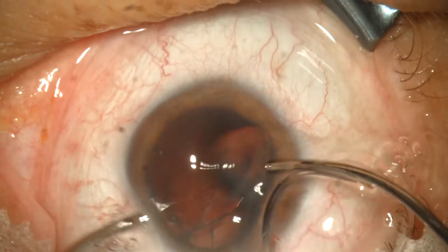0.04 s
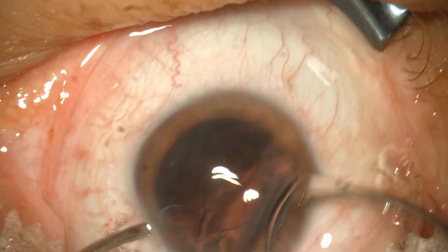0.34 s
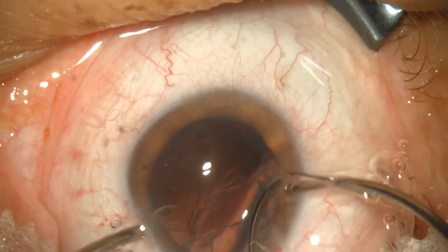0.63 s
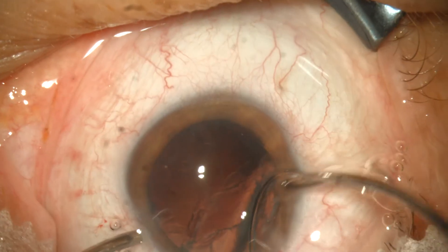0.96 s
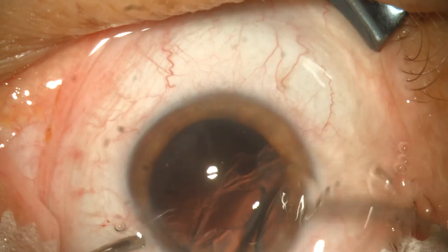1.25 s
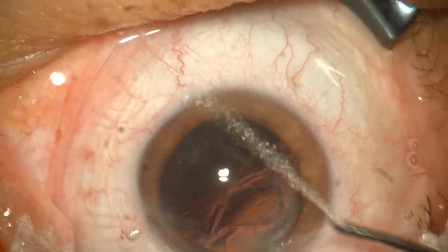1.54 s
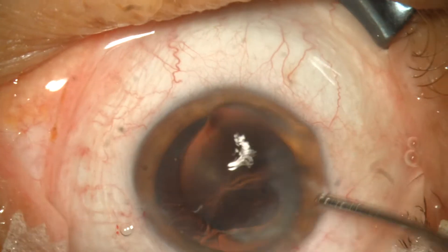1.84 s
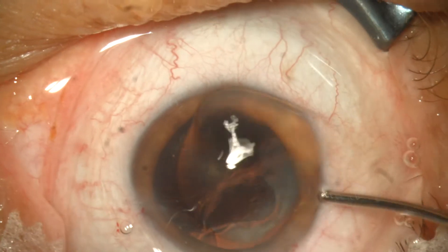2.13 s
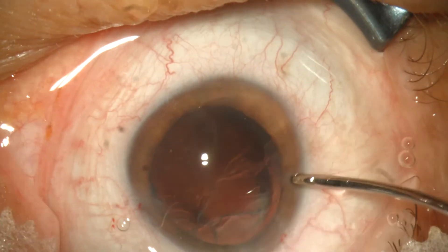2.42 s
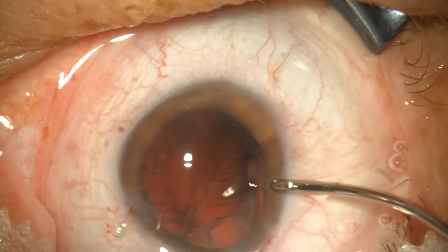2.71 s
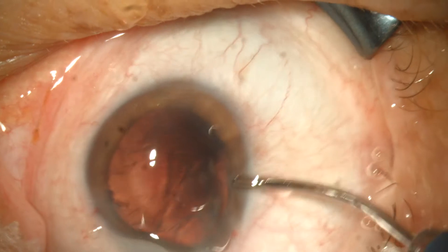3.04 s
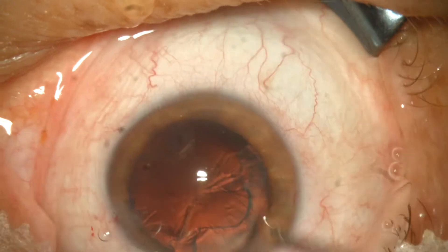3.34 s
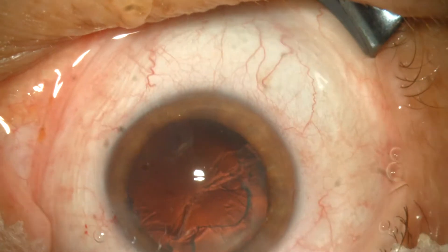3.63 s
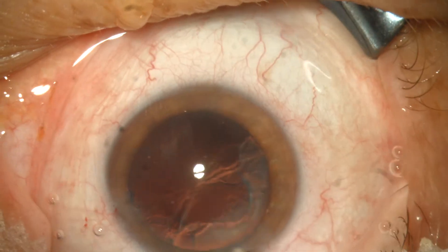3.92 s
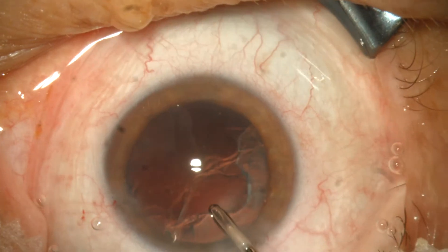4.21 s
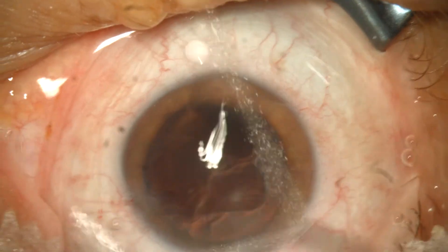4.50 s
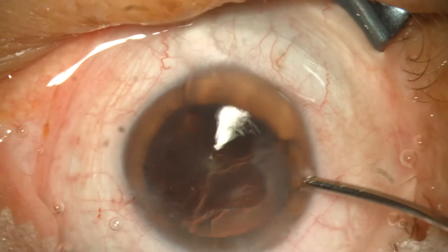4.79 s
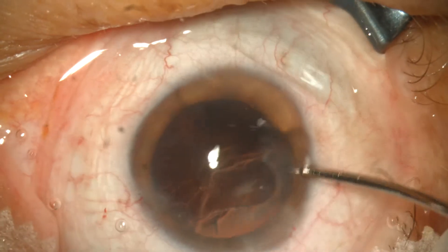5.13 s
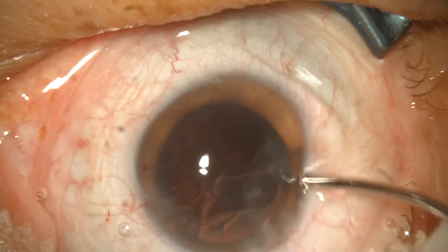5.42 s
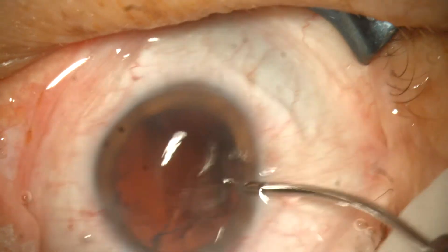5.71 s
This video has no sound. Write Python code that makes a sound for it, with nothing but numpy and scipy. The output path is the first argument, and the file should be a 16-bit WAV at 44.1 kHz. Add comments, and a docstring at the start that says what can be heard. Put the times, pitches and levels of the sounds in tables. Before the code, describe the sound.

Steady, quiet ventilation with a slight fan hum and thin hiss fills an operating room throughout. Dull, low handling bumps come around 0.6 to 0.8 seconds. At 1.3 seconds a steel instrument snaps shut with a sharp, tight click, answered briefly by the hard walls. A soft bump follows at 1.6 seconds, then light ticks of metal tips at 2.6 and around 3.4 seconds. The second snap comes at 3.6 seconds, just as sharp. At 4.2 seconds a small instrument is laid on a pile of others with a bright clink, and from 4.4 to 4.6 seconds a larger one lands, bouncing and ringing as the pile clatters. Another dull bump comes near 4.9 seconds. Very faint swishes of cloth come and go between the events, the last near 5.8 seconds. Everything sits in the centre, picked up by one microphone.

```python
"""An operating room: a steel instrument snaps shut twice, its catch ringing over a noisy crack.
Then two instruments are laid on a pile of others, bouncing and clinking as the pile clatters.
Small ticks of the tips, soft swishes of cloth and dull handling bumps lie between, over steady
ventilation. Hard walls answer each click; one microphone feeds both channels, each with a faint
hiss of its own."""
import sys
import numpy as np
from scipy import signal
from scipy.fft import rfft, irfft, next_fast_len
from scipy.io import wavfile

SR = 44100
rng = np.random.default_rng(int(sys.argv[2]) if len(sys.argv) > 2 else 0)


def file_out(sig):
    """Save sig as 16-bit WAV at sys.argv[1]."""
    # one column per channel
    cols = np.atleast_2d(sig).T
    # limit, then scale
    lim = np.clip(cols, -1, 1)
    pcm = np.round(lim * 32767).astype(np.int16)
    wavfile.write(sys.argv[1], SR, pcm)


N = 258070
TIME = np.arange(N) / SR  # scene clock [s]
AGE = np.arange(SR) / SR  # clock of a one-shot [s]

# reverb of the hard walls: (frequency [Hz], t60 [s])
WALL_DECAY = [(300, 0.94), (1200, 0.77), (2300, 0.63), (4000, 0.41), (7000, 0.42), (14000, 0.39)]
# tone of the air flow: (frequency [Hz], relative density [dB])
AIR_SPECTRUM = [(120, -2), (200, -7.5), (333, -5.5), (400, -2), (564, -0.5), (755, -9), (1280, -7),
                (1710, -14.5), (2450, -13), (2780, -13), (3030, -18), (3270, -14), (3800, -19.5),
                (5800, -20), (15500, -30.5)]
# hum of fans and motors: (frequency [Hz], level [dB])
FAN_TONES = [(23.9, -59.5), (47.8, -70), (96, -73), (388, -73), (710.6, -74), (1583, -78), (2099, -77.5),
             (2735, -74.5)]
# low end of the handling: (frequency [Hz], relative density [dB])
RUMBLE_SPECTRUM = [(25, -3.5), (45, 4.5), (80, 1.5), (150, -4), (250, -11), (400, -21), (800, -71)]
# movements of hands and arms: (peak time [s], relative level [dB], length [s])
HAND_MOVES = [(0.662, -46.5, .11), (.78, -47.5, 0.062), (1.62, -53, .14), (3.03, -51.5, 0.052),
              (3.587, -49.5, .08), (4.087, -55, 0.049), (4.76, -49, .18), (5.519, -61, .06)]
# dull bumps that stand out: (time [s], level [dB], pitch [Hz])
DULL_BUMPS = [(0.627, -39.5, 150), (.685, -43, 210), (.778, -40, 86.4), (1.611, -39, 141),
              (2.44, -46.5, 118), (3.412, -44.5, 88), (4.085, -42.5, 105), (4.73, -45, 180),
              (4.864, -36.5, 202)]
# tone of sliding cloth: (frequency [Hz], relative density [dB])
CLOTH_SPECTRUM = [(500, -23), (1500, 3.5), (3500, -1.5), (5800, 0), (7500, -16), (12000, -22.5)]
# strokes over cloth: (peak time [s], level [dB], length [s])
CLOTH_STROKES = [(0.477, -59, 0.062), (1.025, -61.5, 0.076), (1.54, -59.5, .05), (2.075, -66, 0.22),
                 (2.276, -60, 0.094), (2.644, -61.5, .15), (3.45, -56.5, 0.13), (4.914, -64.5, 0.092),
                 (5.772, -61.5, 0.16)]
# light touches of the tips: (time [s], level [dB], pitch [Hz], half-width [octaves])
TIP_TOUCHES = [(2.623, -40.5, 5000, .24), (3.3425, -49, 5700, .2), (3.3482, -40.5, 1980, 0.1),
               (3.3585, -48.5, 6500, 0.15), (3.392, -42, 5270, 0.22), (3.3987, -42, 5500, 0.18),
               (4.3946, -27, 3800, 0.072)]
# dense modes of the pile: (frequency [Hz], relative density [dB])
PILE_SPECTRUM = [(290, -58), (500, -26), (901, -22), (1410, -12), (1800, -15.5), (1960, -12), (2430, -18),
                 (2650, -10), (3680, -12.5), (4190, -3.5), (5350, -9), (6270, -2), (6830, -17),
                 (7890, -16.5), (15500, -40)]
# modes of the small and the large instrument: (frequency [Hz], relative level [dB], free t60 [s])
SMALL_STEEL_MODES = [(2981, -13, .25), (3900, -6, .2), (4113, -5, .2), (4317, -9, .3), (4554, -4, .12),
                     (5076, -12, .4), (5443, -11, .2), (5705, -3, .3), (5890, -3, .15), (6202, -6, .2),
                     (6330, -9, .15), (7863, -19, .2), (9200, -23, .25), (9980, -24, .25)]
LARGE_STEEL_MODES = [(1249, -21, .5), (1410, -19, .3), (1900, -20, .3), (1997, -23, .5), (2304, -25, .4),
                     (2616, -12, .75), (2875, -18, .5), (3400, -16, .3), (3860, -13, .3), (4077, 0, .28),
                     (4322, -1, .22), (4725, -3, .6), (5001, -11, .35), (5056, -6, .28), (5438, -15, .3),
                     (5705, -8, .3), (6013, -13, .38), (6210, -6, .44), (6270, -6, .32), (6556, -16, .35),
                     (7207, -19, .4), (7342, -14, .55), (7863, -18, .28), (8140, -20, .3), (8366, -20, .3),
                     (8790, -21, .3), (9707, -24, .35), (11880, -31, .2)]
# their contacts with the pile: (time [s], ring level [dB], clatter level [dB], clatter t60 [s])
SMALL_CONTACTS = [(4.2483, -24, -27, 0.08), (4.2522, -32, -26, 0.069), (4.2935, -39, -38, 0.14),
                  (4.329, -37, -55, .06)]
LARGE_CONTACTS = [(4.3990, -45.5, -37, 0.12), (4.4545, -23.5, -29.5, 0.069), (4.4565, -18.5, -22.5, 0.12),
                  (4.4683, -32.5, -40, 0.057), (4.5125, -27, -28.5, 0.048), (4.5545, -40, -37, .14)]
# ring of the catch: (frequency [Hz], relative level [dB], t60 [s])
CATCH_MODES = [(1320, -21, .04), (2190, -6, .02), (3400, 0, .012), (4780, 0, .018), (5300, -2, .018),
               (6600, -8, .01)]
# tone of its crack: (frequency [Hz], relative density [dB])
CRACK_SPECTRUM = [(300, -8.5), (900, -7), (1350, -2.5), (1750, -6.5), (2200, -2), (2750, -14), (3450, 2),
                  (4300, -2), (5300, -1.5), (6700, -3.5), (8000, -16), (9300, -27), (11500, -22.5),
                  (15500, -32)]
# two snaps, the second with a rebound: (time [s], ring level [dB], crack level [dB], crack t60 [s])
CATCH_SNAPS = [(1.2781, -15.5, -26, 0.047), (3.649, -14, -26, 0.039), (3.6548, -26, -35, 0.02)]


def amp(db):
    """Decibels to gain."""
    return 10 ** (np.asarray(db) / 20)


def unit(x):
    """Scale to rms 1."""
    return x / np.sqrt(np.mean(x ** 2) + 1e-20)


def along(points, hz):
    """Read a curve of (frequency [Hz], value) points on a log axis."""
    freqs, values = np.transpose(points)
    return np.interp(np.log(hz + 1), np.log(freqs + 1), values)


def filtered(x, response):
    """EQ x with a gain that depends on frequency."""
    n = x.shape[-1]
    padded = next_fast_len(n + SR // 2)
    return irfft(rfft(x, padded) * response(np.fft.rfftfreq(padded, 1 / SR)), padded)[..., :n]


def noise(spectrum, size):
    """Coloured noise of rms 1."""
    return unit(filtered(rng.standard_normal(size), lambda hz: amp(along(spectrum, hz))))


def fade(t60, t=AGE):
    """A decay that loses 60 dB in t60 seconds."""
    return np.exp(-np.log(1000) * t / t60)


def swell(at, rise, fall):
    """A smooth envelope that peaks at the given time."""
    return np.exp(-((TIME - at) / np.where(TIME < at, rise, fall)) ** 2 / 2)


def add(track, at, sound):
    """Mix a one-shot into a track at a time in seconds."""
    part = track[max(round(at * SR), 0):][:len(sound)]
    part += sound[:len(part)]


def ring(modes):
    """Struck steel rings freely as decaying sines, starting at rms 1."""
    hz, db, t60 = np.transpose(modes)[:, :, None]
    phase = rng.uniform(0, 2 * np.pi, db.shape)
    partials = amp(db) * fade(t60) * np.sin(2 * np.pi * hz * AGE + phase)
    return np.sum(partials, 0) / np.sqrt(np.sum(amp(db) ** 2) / 2)


def room(x, wet_db, early_db):
    """The direct sound, early reflections off nearby surfaces and the diffuse tail of the walls."""
    hz, t, bands = signal.stft(rng.standard_normal(SR), SR, nperseg=256)
    bands = bands * fade(along(WALL_DECAY, hz)[:, None], t)
    tail = signal.istft(bands, SR, nperseg=256)[1][:SR]
    tail *= 1 - np.exp(-AGE / 0.0066)  # the reverb builds up
    impulse = amp(wet_db) * tail / np.linalg.norm(tail)
    delays = rng.uniform(0.0034, .013, size=10)
    impulse[(delays * SR).astype(int)] += amp(early_db) * rng.choice([-1, 1], size=10) / np.sqrt(10)
    return x + signal.fftconvolve(x, impulse)[:N]


def ventilation(air_db=-57):
    """The bed: steady air flow under the slightly wavering hum of fans and motors."""
    out = amp(air_db) * noise(AIR_SPECTRUM, N)
    for hz, db in FAN_TONES:
        drift = np.cumsum(rng.standard_normal(N)) / np.sqrt(SR)
        out += amp(db) * np.sqrt(2) * np.sin(2 * np.pi * hz * TIME + drift)
    return out


def jostles(per_second=45, boost_db=1.5, pitch_hz=175, scatter_octaves=.35):
    """Small pushes scattered through each movement: (time [s], level [dB], pitch [Hz])."""
    pushes = []
    for at, db, length in HAND_MOVES:
        draws = rng.standard_normal((32, 3))[:round(per_second * length)]
        for offset, accent, detune in draws:
            hz = pitch_hz * 2 ** (scatter_octaves * detune)
            pushes.append((at + offset * length / 3, db + boost_db + 2 * accent, hz))
    return pushes


def handling(rumble_trim_db=-2.5, floor_db=-63, push_cycles=1.34):
    """Soft pushes of a cycle or two, on a low rumble that swells as hands and arms move."""
    effort = sum(amp(db) * swell(at, length / 2, length / 2) for at, db, length in HAND_MOVES)
    out = np.hypot(amp(rumble_trim_db) * effort, amp(floor_db)) * noise(RUMBLE_SPECTRUM, N)
    t = AGE - .5  # each push peaks midway through its one-shot
    for at, db, pitch in DULL_BUMPS + jostles():
        envelope = np.exp(-(2 * t * pitch / push_cycles) ** 2)
        tone = np.sin(2 * np.pi * pitch * t + rng.uniform(0, 2 * np.pi))
        add(out, at - .5, amp(db) * envelope * tone)
    return out


def cloth_swishes(rise_share=0.26):
    """Cloth slides softly: each stroke swells quickly and tails off more slowly."""
    envelope = sum(amp(db) * swell(at, rise_share * length, (1 - rise_share) * length)
                   for at, db, length in CLOTH_STROKES)
    return envelope * noise(CLOTH_SPECTRUM, N)


def tip_ticks(t60=0.015):
    """The tips touch lightly, each tick a short noise burst through one resonance."""
    out = np.zeros(N)
    for at, db, pitch, octaves in TIP_TOUCHES:
        white = rng.standard_normal(SR)
        burst = filtered(white, lambda hz: 1 / (1 + (np.log2((hz + 1) / pitch) / octaves) ** 2))
        add(out, at, amp(db) * unit(burst) * fade(t60))
    return room(out, wet_db=-12, early_db=-21)


def clinks(contacts, modes, damping_t60, attack_s=0.0003):
    """An instrument lands and bounces: its ring is choked by the pile, which clatters briefly."""
    out = np.zeros(N)
    onset = 1 - np.exp(-AGE / attack_s)
    for at, ring_db, clatter_db, t60 in contacts:
        steel = amp(ring_db) * ring(modes) * fade(damping_t60)
        pile = amp(clatter_db) * noise(PILE_SPECTRUM, SR) * fade(t60)
        add(out, at, (steel + pile) * onset)
    return out


def instruments_laid_down():
    """A small instrument, then a large one, land in the same place and share its reverb."""
    small = clinks(SMALL_CONTACTS, SMALL_STEEL_MODES, damping_t60=0.1)
    large = clinks(LARGE_CONTACTS, LARGE_STEEL_MODES, damping_t60=0.18)
    return room(small + large, wet_db=-6.5, early_db=-5.5)


def catch_snaps(attack_s=0.00096):
    """The catch snaps shut: its tight ring stays mostly dry, while the crack fills the room."""
    rings, cracks = np.zeros((2, N))
    onset = 1 - np.exp(-AGE / attack_s)
    for at, ring_db, crack_db, t60 in CATCH_SNAPS:
        add(rings, at, amp(ring_db) * ring(CATCH_MODES) * onset)
        add(cracks, at, amp(crack_db) * noise(CRACK_SPECTRUM, SR) * fade(t60) * onset)
    return room(rings, wet_db=-10.5, early_db=-9.5) + room(cracks, wet_db=-2, early_db=-10)


def scene():
    """All layers meet at one microphone, panned centre."""
    steel = catch_snaps() + instruments_laid_down() + tip_ticks()
    mono = steel + cloth_swishes() + handling() + ventilation()
    return np.array([mono, mono])


def record(dry, hiss_low_cut_hz=350, high_cut_hz=15900):
    """Each channel adds its own thin hiss, then a brick-wall high cut trims the mix."""
    hiss = amp(-64) * rng.standard_normal(dry.shape)
    hiss = filtered(hiss, lambda hz: hz ** 3 / (hz ** 3 + hiss_low_cut_hz ** 3))
    return filtered(dry + hiss, lambda hz: hz < high_cut_hz)


dry = scene()
out = record(dry)
file_out(out)
```